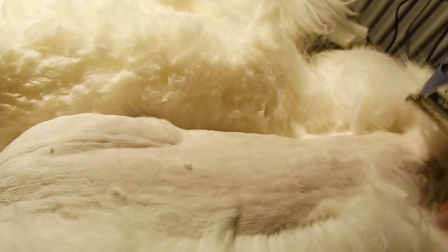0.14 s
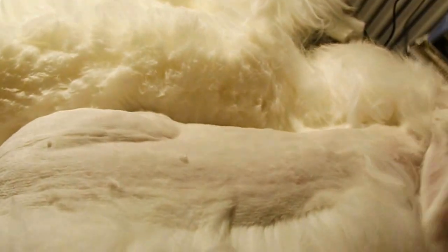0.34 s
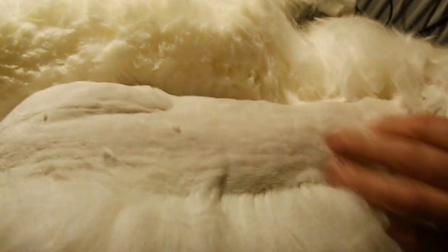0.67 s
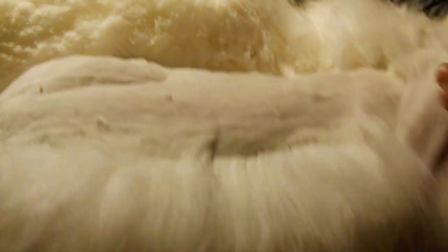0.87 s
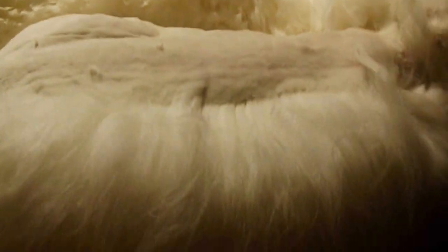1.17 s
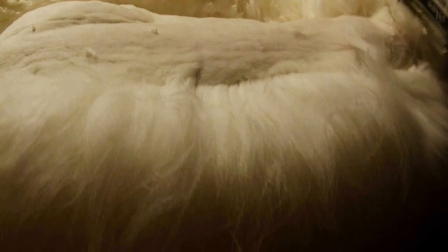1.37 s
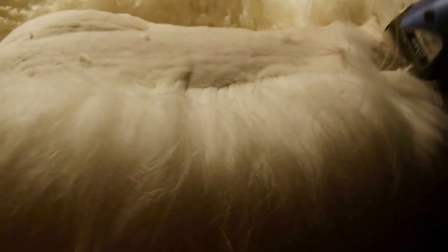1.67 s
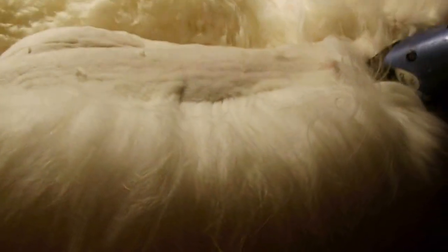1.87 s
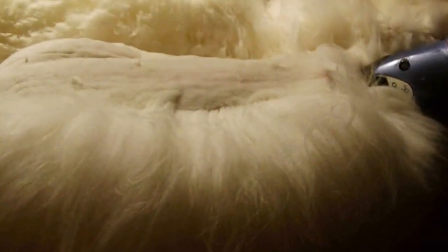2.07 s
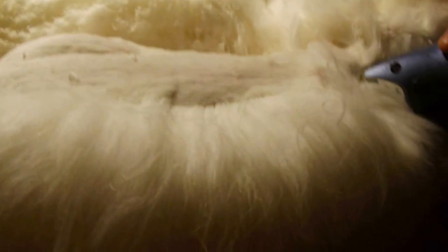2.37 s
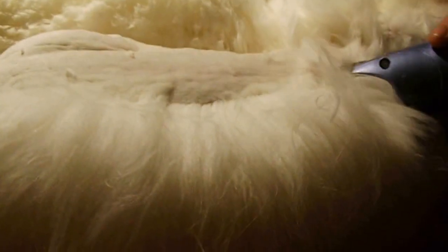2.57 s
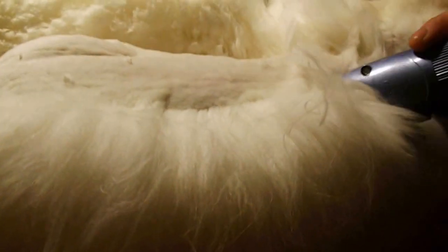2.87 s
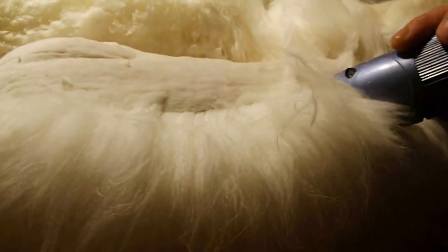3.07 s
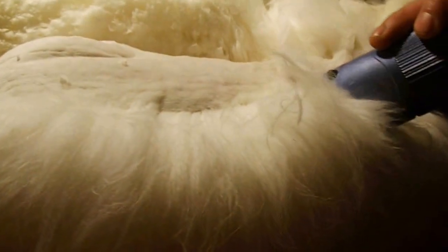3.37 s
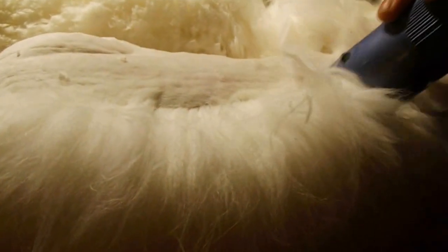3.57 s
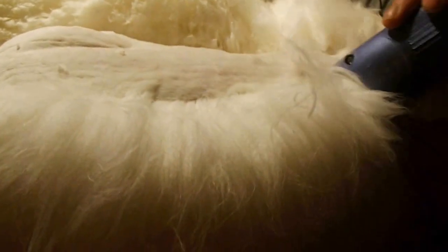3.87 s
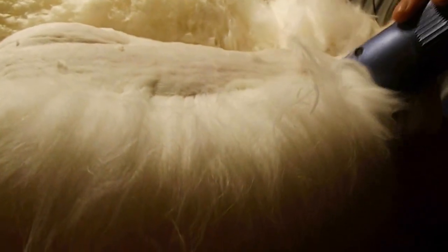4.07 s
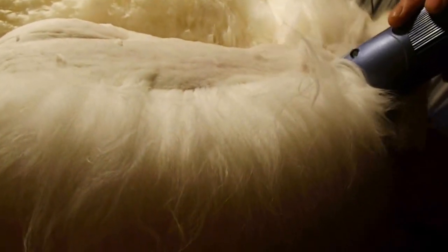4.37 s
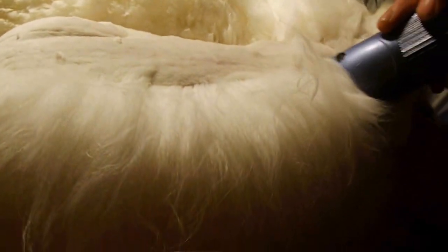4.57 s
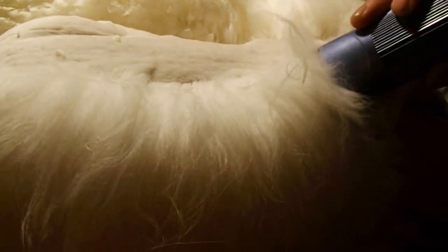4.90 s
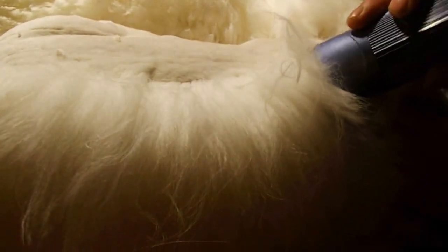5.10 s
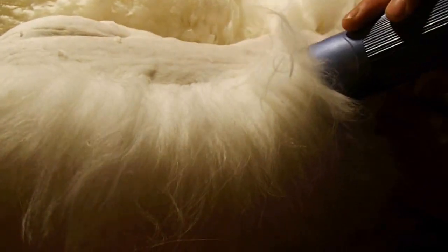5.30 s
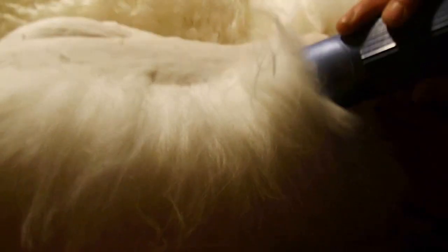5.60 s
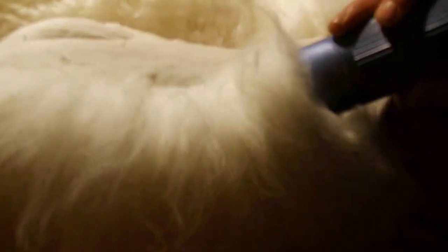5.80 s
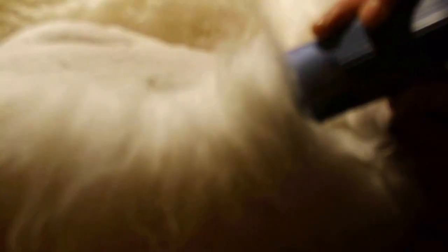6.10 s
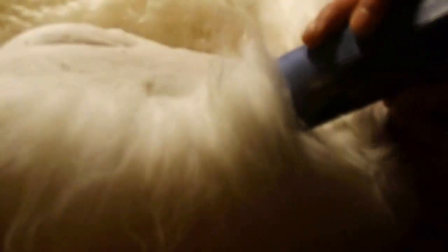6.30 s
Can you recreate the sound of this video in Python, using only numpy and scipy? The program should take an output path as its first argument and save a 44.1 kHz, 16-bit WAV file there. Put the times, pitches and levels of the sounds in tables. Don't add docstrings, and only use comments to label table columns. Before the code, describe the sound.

Electric clippers are already running at 0 seconds and continue without a break to the end at about 6.4 seconds, very close to the microphone. The motor gives a dense, high whine of many steady tones, its pitch drifting only slightly, over rapid blade knocking of roughly ninety strokes a second, gritty repeating gear clatter, ringing steel, hair rustle and bright hiss. Two faint bumps come at 0.1 to 0.25 seconds, and a sharp, dry snap at 1.06. Around 1.8 to 1.9 soft thuds mark the clippers pressing harder on the animal's body, bringing out lower hum. The whine dips a little near 3.3. From 3.9 dull low bumps return, clustering between about 5 and 5.9, with the firmest pressure near 4.9. Throughout, individual whistles fade and swell as hand and fur muffle them. A faint room rumble lies underneath; the stereo is narrow and dry.

```python
import sys
import numpy as np
from scipy import signal
from scipy.fft import rfft, irfft, next_fast_len
from scipy.io import wavfile
from scipy.ndimage import uniform_filter1d, map_coordinates

SR = 44100
rng = np.random.default_rng(int(sys.argv[2]) if len(sys.argv) > 2 else 0)


def volts_from_db(level):
    exponent = np.asarray(level, float) / 20
    return 10 ** exponent


def file_out(sig):
    cols = np.atleast_2d(sig).T
    lim = np.clip(cols, -1, 1)
    pcm = np.round(lim * 32767).astype(np.int16)
    wavfile.write(sys.argv[1], SR, pcm)


N = 284429
T = np.arange(N) / SR
SIZE = next_fast_len(N)
SHAFT_PER_WHEEL, STROKES = 20, 6
FIRST_STROKE = 0.0179
RIPPLE_HZ = 99.9

# time_s, shaft_hz
MOTOR_SPEED = [(0.0, 303.02), (0.2, 304.36), (0.45, 305.1), (0.9, 305.52), (1.25, 305.34), (1.7, 305.1),
               (2.2, 305.47), (2.8, 304.95), (3.3, 303.38), (3.6, 303.38), (4.0, 303.86), (4.35, 304.24),
               (4.8, 302.96), (5.1, 304.44), (5.4, 304.72), (5.7, 303.88), (6.1, 303.81), (6.45, 304.36)]
# shaft_multiple, level_db
MOTOR_WHINE = [(1, -61), (2, -49), (4, -46), (6, -41), (7, -45), (8, -43), (9, -46), (10, -38), (11, -35),
               (12, -38), (13, -56), (14, -52), (16, -45), (17, -54), (18, -55), (19, -56), (20, -52),
               (21, -48), (22, -45), (23, -50), (24, -36), (25, -40), (26, -44.5), (27, -43), (28, -42),
               (29, -44), (30, -52), (31, -51), (32, -44), (33, -54)]
# shaft_multiple, ripple_steps, level_db, share of the strong line's fade (0-1)
RIPPLE_LINES = [(16, -2, -62, .3), (16, -1, -50.5, .2), (16, 1, -51.5, .2), (16, 2, -57, .3),
                (24, 1, -47, .35), (32, 1, -51, .9), (33, 1, -63, .3)]
# shaft_multiple, level_db
GRIP_LEVELS = [(1, -5), (2, 1), (4, 0), (6, -3.5), (8, -2), (10, 1), (11, -3), (12, .5), (14, -1.5),
               (16, -.5), (17, -2), (21, -2.5), (22, -2.5), (24, -1.5), (25, .5), (26, -2), (27, -3),
               (28, -1), (29, -3), (30, -1), (31, -1), (32, 0)]
# middle_s, length_s, shaft_multiple,
# change_db
HOUSING_GRIPS = [(1.75, .25, 2, -7), (3.3, .9, 2, -9), (5.9, 1.3, 2, -6), (1.75, .25, 4, -7),
                 (.72, .62, 6, 10), (1.05, .2, 6, 4), (1.35, .25, 6, -3), (1.85, .5, 6, 6),
                 (2.65, .6, 6, -6), (3.7, .6, 6, 5), (6.2, .6, 6, 5.5), (.82, .6, 10, -9),
                 (1.95, .6, 10, -6), (2.8, .6, 10, 4), (4.85, .4, 10, -5), (5.85, .3, 10, -7),
                 (6.15, .3, 10, 2), (.8, .8, 11, 4), (2.25, .9, 11, 6), (3.17, .8, 11, 6.5),
                 (4.35, .35, 11, -10), (5.85, .3, 11, 4), (6.42, .3, 11, -6), (.3, .8, 12, -9),
                 (2.05, .5, 12, -4), (2.68, .55, 12, -10), (3.75, .3, 12, -11), (4.8, .5, 12, 2),
                 (6.15, .5, 12, 2), (2.1, .5, 14, 4), (2.7, .5, 14, -6), (6.4, .3, 14, 5),
                 (.17, .25, 16, 4), (.44, .2, 16, -6), (1.1, .5, 16, -4), (1.66, .2, 16, -10),
                 (4.98, .12, 16, -10), (2.2, .5, 16, 2), (2.82, .45, 16, 5), (3.32, .25, 16, -13),
                 (4.35, .35, 16, -6), (5.82, .45, 16, 4), (6.42, .25, 16, -4),
                 (.75, .8, 21, 4), (4.55, .5, 21, 3), (5.7, .4, 21, 4), (1.35, .3, 22, 3), (2.22, .3, 22, 6),
               (5.25, .3, 22, -6), (6.0, .9, 22, 3), (2.2, .8, 26, -2), (3.0, .4, 26, 3), (4.15, .4, 26, 6),
               (4.95, .3, 26, -7), (6.42, .3, 26, 10), (1.35, .3, 27, 4), (2.1, .5, 27, -6),
               (3.15, .6, 27, 3), (4.65, .25, 27, 6), (.08, .2, 28, 4), (.42, .3, 28, -7), (.72, .2, 28, 4),
               (.98, .15, 28, -4), (1.14, .1, 28, 5), (1.65, .35, 28, -4), (2.4, .45, 28, -9),
               (3.1, .2, 28, -4), (4.15, .15, 28, 4), (4.56, .2, 28, -10), (4.98, .12, 28, -7),
               (5.55, .6, 28, 2), (6.12, .2, 28, -7), (6.38, .2, 28, 3), (.8, .4, 29, 5), (2.1, .5, 29, -3),
               (3.3, .5, 29, -8), (6.42, .25, 29, 5), (.12, .3, 32, -6), (.45, .2, 32, -5),
               (1.0, .3, 32, -2), (1.75, 1.8, 32, -6), (1.75, .4, 32, -3), (2.72, .35, 32, -3),
               (4.5, .5, 32, -5), (6.2, .5, 32, 2),
                 (.12, .2, 24, -7), (.36, .2, 24, 3), (1.1, .2, 24, -4), (1.32, .2, 24, 2),
                 (1.5, .1, 24, -8), (2.27, .2, 24, 3), (3.2, 1.3, 24, -5), (3.02, .15, 24, -6),
                 (3.78, .1, 24, -10), (4.62, .12, 24, -15), (4.85, .15, 24, 3), (5.05, .2, 24, -4),
                 (5.68, .2, 24, 4), (6.35, .5, 24, -7), (.7, .2, 25, -6), (1.55, .5, 25, -3),
                 (2.05, .55, 25, -11), (2.9, .35, 25, -7), (3.66, .1, 25, -6), (4.62, .3, 25, -8),
                 (5.15, .3, 25, 2), (5.7, .4, 25, -5), (6.35, .3, 25, -7)]
# middle_s, length_s, ripple_steps, change_db
RIPPLE_SWELLS = [(.9, .15, 1, 7), (1.4, .35, 1, 6), (2.36, .4, 1, 5), (3.1, .5, 1, -3), (4.5, 2, 1, -5),
                 (5.9, .3, 1, -5), (6.42, .2, 1, 9), (.1, .3, -1, 5), (.72, .3, -1, 3), (1.0, .12, -1, -6),
                 (1.65, .4, -1, -3), (2.65, .3, -1, 2), (3.2, .5, -1, 4), (4.3, 1.2, -1, -5),
                 (4.8, .2, -1, -5)]

# crank_multiple, level_db
SHELL_LINES = [(5, -66), (7, -56.5), (9, -56.5), (12, -61.5), (16, -60), (18, -66.5), (26, -50.5),
               (34, -52), (47, -52), (51, -43), (53, -47), (61, -46), (62, -44), (67, -40.5), (71, -40),
               (78, -42)]
# middle_s, length_s, crank_multiple, change_db
SHELL_TOUCHES = [(5.1, 1.4, 47, 8), (3.8, 1, 47, 4), (1.0, 2.4, 61, 4), (.3, .5, 61, 3), (.75, .4, 62, -7),
                 (5.2, .6, 62, -6), (5.75, .4, 67, -4), (6.3, .4, 67, 6), (.5, 1.6, 9, -7),
                 (3.4, 3.2, 67, 7), (.8, 1.2, 67, -3), (1.9, 1.2, 71, 3.5), (1.62, .4, 71, 5),
                 (5.6, 2.2, 71, -6), (3.3, .5, 71, -5), (2.4, .4, 51, -5), (1.6, 1.7, 53, -5),
                 (3.6, 1.4, 53, 3), (5.6, 1.7, 53, 7), (1.45, .5, 78, 7), (2.5, .7, 78, -5),
                 (4.3, .8, 78, -5)]
SHELL_THROB = {47: (.7, .13), 51: (.45, .43), 61: (.7, .15), 62: (.6, .83), 67: (.55, .78), 71: (.65, .65),
               78: (.5, .85)}
# time_s, change_db
BODY_PRESS = [
    (0, -10),
    (1.3, -9),
    (1.9, -3),
    (4.2, -1),
    (4.9, 3),
    (6.45, 0.5),
]

STROKE_LEVELS = [-1.5, 4.5, -4, 5.5, -2, 5.5]
BLADE_STRIKES = [-5, -1.5, 0, 2, .5, 6]
# pitch_hz, width_hz, level_db
CUTTING_RING = [(2487, 930, -11.5), (2920, 500, -2)]
# pitch_hz, width_hz, level_db
CLEAR_RING = [(3230, 9.6, -5.5), (3135, 97, 0)]
# pitch_hz, width_hz, level_db
CUT_HAIR = [(979, 320, -22.5), (7460, 600, -27.5), (8650, 2880, -28.5)]
# middle_s, length_s, pitch_hz, change_db
DENSE_TUFTS = [
    (.9, .5, 7460, 5),
    (3.75, .3, 7460, 2),
    (2.1, .5, 7460, -3),
]
# pitch_hz, level_db per Hz
HISS_COLOUR = [(350, -81.5), (930, -71), (1400, -71.5), (2300, -70.5), (3200, -55.5), (3600, -62),
               (4000, -70.5), (4500, -78.5), (5500, -78), (7500, -61.5), (9500, -74.5), (10700, -81.5),
               (11600, -100), (14800, -77)]
# pitch_hz, level_db per Hz
WHEEL_COLOUR = [(450, -96), (950, -77), (1400, -77.5), (2100, -65), (2800, -60.5), (3200, -58), (3600, -64),
                (4000, -80.5), (4500, -83), (5500, -75.5), (7600, -74.5), (9000, -72.5), (11000, -100)]
# pitch_hz, level_db per Hz
CRANK_COLOUR = [(300, -101.5), (560, -75), (1150, -75.5), (1800, -67.5), (2400, -77.5), (3000, -62.5),
                (3500, -65.5), (4000, -76.5), (4600, -91.5), (7200, -86), (9000, -72), (11000, -100)]
# pitch_hz, level_db per Hz
KNOCK_COLOUR = [(400, -100), (900, -77.5), (1400, -76), (1850, -67.5), (2300, -63.5), (2800, -60),
                (3500, -84.5), (4100, -103), (6000, -102), (7500, -78), (10000, -100)]

# time_s, bite_db into the fur, clear_db of the fur, vent_db turned to the listener
HAND_MOVES = [(0, 0, 2, 0.5), (.35, -1, 0.8, 1), (.75, 1, -1, 4), (1.1, -3, 0.5, 3.5), (1.35, -0.5, 1, 2.5),
              (1.7, 0.5, 0.5, 0.5), (2.05, -0.5, -1, -1), (2.55, -3, -0.5, 1), (2.8, 0, -1, 0.5),
              (3.2, 1.7, 1.5, 2.5), (3.65, 0.5, 0.9, 2), (4.0, 0, -1.5, 2.5), (4.4, 0.5, -1, 2),
              (4.9, 1, -1.2, 3.5), (5.5, 1, -3, 3.5), (5.9, 1.5, 0.1, 3.5), (6.25, 1, 1.4, 2),
              (6.45, 0.5, 1.8, 3)]
BAND_EDGES = [1400, 2700, 4800]
BITE_FELT = [0.44, 0.93, .01, .01]
CLEAR_FELT = [0.065, .01, 0.56, .01]
TURN_FELT = [.01, .01, .01, 0.63]
FUR_FLUTTER = [.6, .3, 1.1, .2]

# pitch_hz, level_db
DEEP_HUM = [(30, -62), (46, -61)]
# pitch_hz, level_db per Hz
ROOM_RUMBLE = [(15, -76), (40, -85), (70, -102), (120, -105), (200, -105), (400, -102)]
# start_s, peak_db, pitch_hz
HOUSING_BUMPS = [(.12, -45, 180), (.23, -44, 210), (1.84, -46, 110), (5.36, -40, 110), (5.6, -47, 110),
                 (1.791, -37, 211), (1.839, -39, 268), (3.929, -37, 314), (4.164, -33, 264),
                 (4.548, -33, 270), (4.653, -35, 316), (4.967, -35, 271), (5.034, -30, 305),
                 (5.142, -31, 313), (5.404, -34, 288), (5.46, -34, 262), (5.59, -34, 268), (5.67, -33, 290),
                 (5.801, -34, 287), (5.88, -34, 300), (5.936, -40, 242)]
# start_s, peak_db, pitch_hz, fade_60db_s
TOOTH_SNAP = [
    (1.0574, 1.5, 2100, .005),
    (1.0571, -10, 3500, .003),
]


def unit(x):
    return x / np.sqrt(np.mean(x ** 2))


def walk(rate):
    k = int(200 / rate)
    steps = np.repeat(rng.standard_normal(1300 // k + 2), k)
    smooth = uniform_filter1d(uniform_filter1d(steps, k), k)
    return np.interp(T * 200, np.arange(len(steps)), unit(smooth))


def table_curve(table, column=1):
    columns = np.transpose(table)
    return np.interp(T, columns[0], columns[column])


def line(turns, db, tremble):
    level = volts_from_db(db + .8 * walk(18)) * np.sqrt(2)
    return level * np.cos(2 * np.pi * (turns + tremble * walk(14)))


def grip(rows, part):
    ramp = np.array([-.75, -.25, .25, .75])
    return sum(np.interp(T, s + length * ramp, [0, db, db, 0]) for s, length, k, db in rows if k == part)


def colour(x, points):
    hz, db = np.transpose(points)
    size = 2 ** 13
    bins = np.log(np.fft.rfftfreq(size, 1 / SR) + 1)
    log_gain = np.log(volts_from_db(np.interp(bins, np.log(hz), db)) * np.sqrt(SR / 2))
    cepstrum = irfft(log_gain)
    cepstrum[1:size // 2] *= 2
    cepstrum[size // 2 + 1:] = 0
    return signal.fftconvolve(x, irfft(np.exp(rfft(cepstrum))))[:N]


def resonate(x, modes):
    out = 0
    for hz, width, db in modes:
        peak = np.hstack(signal.iirpeak(hz, hz / width, SR))
        out = out + volts_from_db(db) * signal.sosfilt([peak] * 2, x)
    return out


def motor(shaft):
    grips = HOUSING_GRIPS
    fades = {k: db + grip(grips, k) for k, db in GRIP_LEVELS}
    faint_top = [(k, -67.5 + 5 * (k % 8 == 0)) for k in range(34, 50)]
    out, starts = 0, {}
    for k, db in [*MOTOR_WHINE, *faint_top]:
        starts[k], wander = rng.random(), walk(4)
        fade = fades[k] + 0.5 * wander if k in fades else 3.8 * wander - 2.5
        flicker = 1.1 * (1.6 if 20 < k < 30 else .8) * walk(11)
        out = out + line(k * shaft + starts[k], db + .004 * k ** 2 + fade + flicker, .022)
    speed = np.gradient(shaft) * SR
    eased = 2.5 + 2 * (speed - speed.mean())
    for k, step, db, follow in RIPPLE_LINES:
        turns = k * shaft + starts[k] + step * RIPPLE_HZ * T + .07 + .05 * walk(3)
        fade = (1 - follow) * eased + follow * fades.get(k, 0)
        swell = (k == 16) * grip(RIPPLE_SWELLS, step)
        out = out + line(turns, db + fade + swell + .7 * walk(4), .022)
    return out


def housing(crank):
    press = table_curve(BODY_PRESS)
    since_hard = crank - (FIRST_STROKE * STROKES + 1) / 2
    wheel = crank * 2 / STROKES
    out = 0
    for k, db in SHELL_LINES:
        level = db + 0.9 * walk(2) + press * (k < 8) + grip(SHELL_TOUCHES, k)
        tone = line(round(k) * since_hard + .06 * walk(1.5), level, .02)
        depth, crest = SHELL_THROB.get(k, (0, 0))
        out = out + tone * (1 + depth * np.cos(2 * np.pi * (wheel - crest)))
    return out


def train(at, size):
    taps = np.arange(-8, 9)
    index = np.round(at).astype(int)[:, None] + taps
    out = np.zeros(N + 64)
    np.add.at(out, index, size[:, None] * np.sinc(index - at[:, None]) * np.hanning(len(taps)))
    return out[:N]


def clatter(turns, memory, size):
    count = int(turns[-1])
    fresh = rng.standard_normal((count + 40, size))
    rounds = signal.lfilter([1], [1, -memory], fresh, axis=0)[-count - 2:]
    return unit(map_coordinates(rounds.ravel(), [turns * size], order=3))


def strokes(wheel):
    count = int(wheel[-1] * STROKES)
    number = np.arange(count)
    chance = rng.standard_normal((count, 2))
    at = np.interp(number / STROKES + FIRST_STROKE, wheel, np.arange(N)) + .5 * chance[:, 0]
    harden = .25 * np.interp(at / SR, *np.transpose(BODY_PRESS)) * (number % 2 == 0)
    size = volts_from_db(harden + .8 * chance[:, 1] + 0.4 * walk(2.69)[at.astype(int)])
    way = -(-1.) ** number
    knocks = train(at, way * size * volts_from_db(np.resize(STROKE_LEVELS, count)))
    strikes = train(at, way * size * volts_from_db(np.resize(BLADE_STRIKES, count)))
    return knocks, strikes


def shearing(clear):
    out = 0
    for mode in CUT_HAIR:
        level = 1.5 * walk(3.7) + 1.0 * clear + grip(DENSE_TUFTS, mode[0])
        out = out + volts_from_db(level) * resonate(rng.standard_normal(N), [mode])
    return out


def blade(wheel):
    knocks, strikes = strokes(wheel)
    fade = np.exp(-1 / (0.0016 * SR))
    swell = signal.lfilter([1], [1, -fade], np.abs(uniform_filter1d(knocks, 45)))
    wheel_clatter = clatter(wheel, 0.942, size=3072) * unit(1 + 1.2 * swell)
    crank_clatter = clatter(wheel * STROKES / 2, 0.96, size=1024) * unit(1 + 1.7 * swell)
    hiss = rng.standard_normal(N) * unit(1 + 0.26 * swell)
    clear = table_curve(HAND_MOVES, 2)
    rung = volts_from_db(-17.0) * resonate(unit(strikes), CUTTING_RING)
    rung = rung + volts_from_db(-18.0 + 6 * clear) * resonate(unit(strikes), CLEAR_RING)
    gears = colour(wheel_clatter, WHEEL_COLOUR) + colour(crank_clatter, CRANK_COLOUR)
    return rung + shearing(clear) + colour(unit(knocks), KNOCK_COLOUR) + gears + colour(hiss, HISS_COLOUR)


def muffle(x):
    s, bite, clear, turn = np.transpose(HAND_MOVES)
    levels = np.outer(BITE_FELT, bite) + np.outer(CLEAR_FELT, clear) + np.outer(TURN_FELT, turn)
    hz, spectrum = np.fft.rfftfreq(SIZE, 1 / SR), rfft(x, SIZE)
    below = [0, *[1 / (1 + (hz / edge) ** 8) for edge in BAND_EDGES], 1]
    out = 0
    for low, high, db, flutter in zip(below, below[1:], levels, FUR_FLUTTER):
        band = irfft(spectrum * (high - low), SIZE)[:N]
        out = out + band * volts_from_db(np.interp(T, s, db) + flutter * walk(9))
    return out


def hum_and_rumble():
    hum = sum(volts_from_db(db + 2 * walk(3.4)) * np.sqrt(2) * np.sin(2 * np.pi * hz * T) for hz, db in DEEP_HUM)
    return hum + colour(rng.standard_normal(N), ROOM_RUMBLE) * volts_from_db(0.83 * walk(4.26))


def ring(s, db, hz, t60, rise):
    age = np.maximum(T - s, 0)
    fade = (1 - np.exp(-age / rise)) * np.exp(-np.log(1000) * age / t60)
    return volts_from_db(db) * np.sin(2 * np.pi * hz * age) * fade


def bumps():
    return sum(ring(s, db + .5, hz, t60=0.11, rise=0.0062) for s, db, hz in HOUSING_BUMPS)


def snap():
    return sum(ring(*mode, rise=0.00031) for mode in TOOTH_SNAP)


def scene():
    shaft = np.cumsum(table_curve(MOTOR_SPEED)) / SR
    wheel = shaft / SHAFT_PER_WHEEL
    crank = wheel * STROKES / 2
    clippers = muffle(motor(shaft) + housing(crank) + blade(wheel))
    near = clippers + hum_and_rumble() + bumps() + snap()
    port_lag_s = 2.3e-5
    lag = np.exp(-1j * np.pi * np.fft.rfftfreq(SIZE, 1 / SR) * port_lag_s)
    spectrum = rfft(near, SIZE)
    ports = np.array([irfft(spectrum * lag, SIZE)[:N], irfft(spectrum / lag, SIZE)[:N]])
    diffuse = np.diff(colour(rng.standard_normal(N), HISS_COLOUR), prepend=0) * volts_from_db(-37)
    return ports + diffuse * np.array([[1], [-1]])


def smooth_filter(x, order, hz, kind="low"):
    return signal.sosfiltfilt(signal.butter(order, hz, kind, fs=SR, output="sos"), x)


def low_pass(x):
    return signal.sosfilt(signal.butter(12, 15800, fs=SR, output="sos"), x)


def record(dry):
    mid, side = (dry[0] + dry[1]) / 2, (dry[0] - dry[1]) / 2
    high = smooth_filter(side, 6, 2150, "high")
    bass = smooth_filter(side, 4, 750)
    side = high + volts_from_db(-0.5) * bass + volts_from_db(-4.5) * (side - high - bass)
    mix = smooth_filter([mid + side, mid - side], 8, 15450)
    return low_pass(mix)


dry = scene()
out = record(dry)
file_out(out)
```